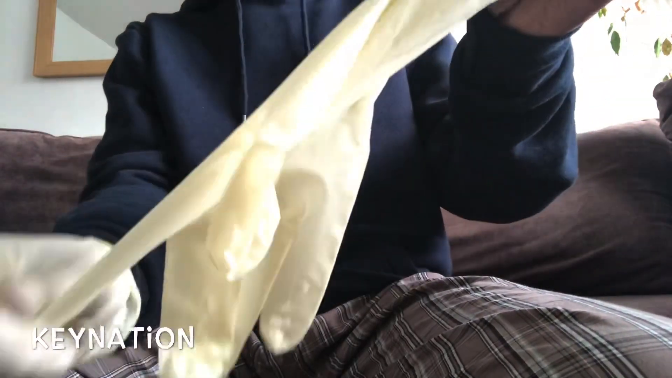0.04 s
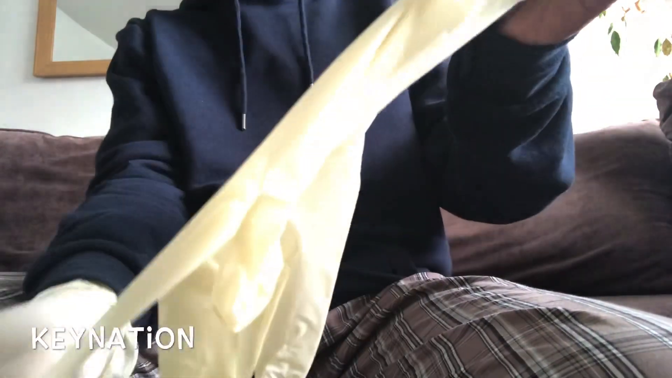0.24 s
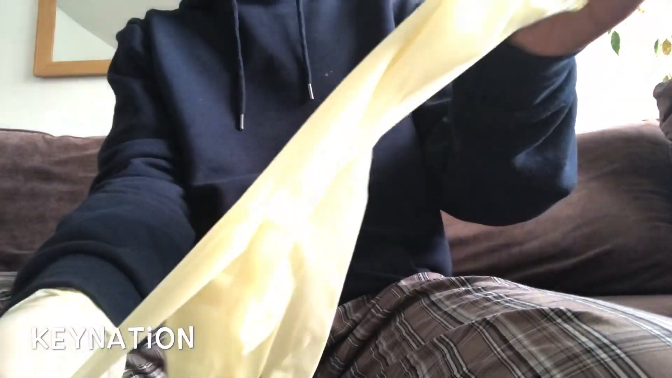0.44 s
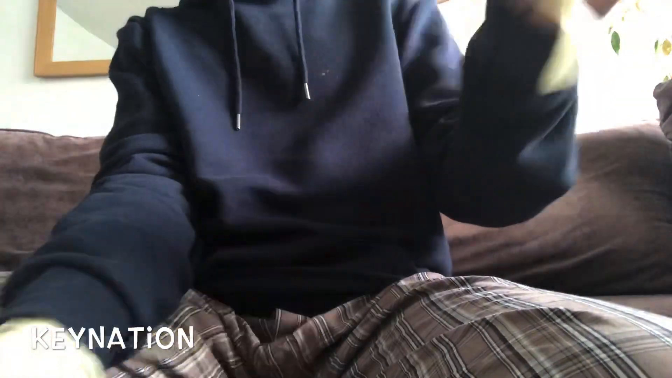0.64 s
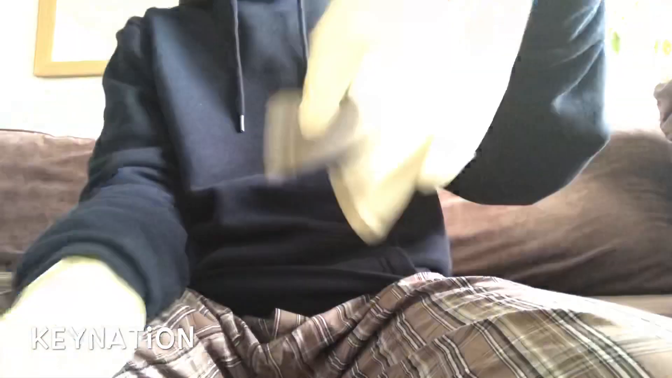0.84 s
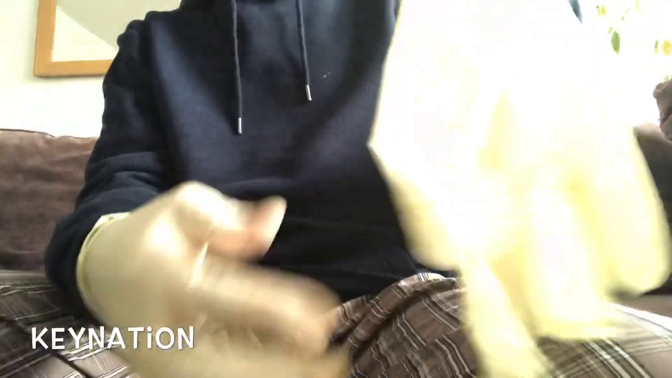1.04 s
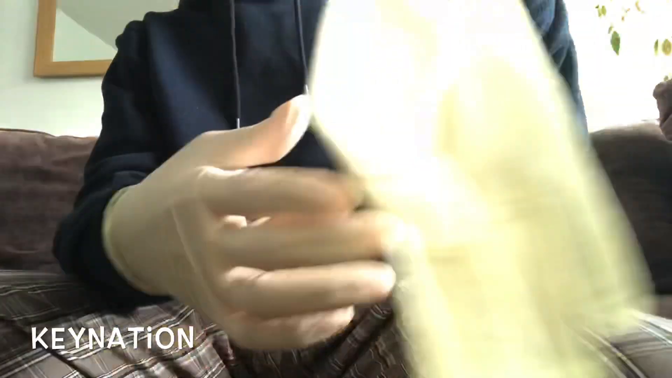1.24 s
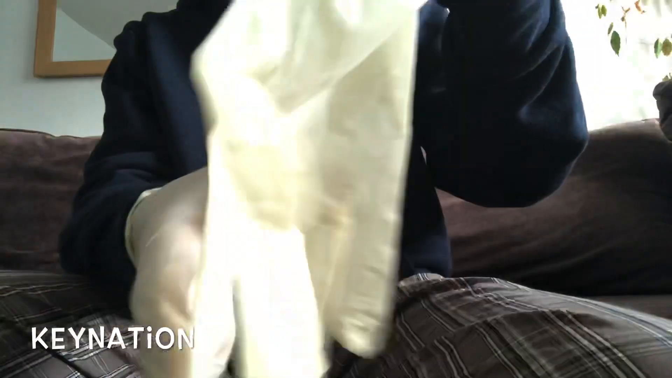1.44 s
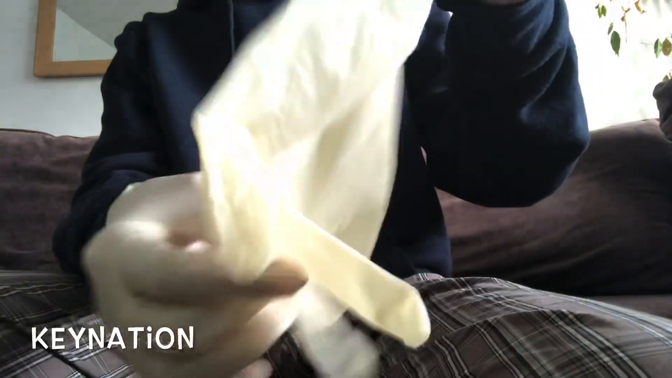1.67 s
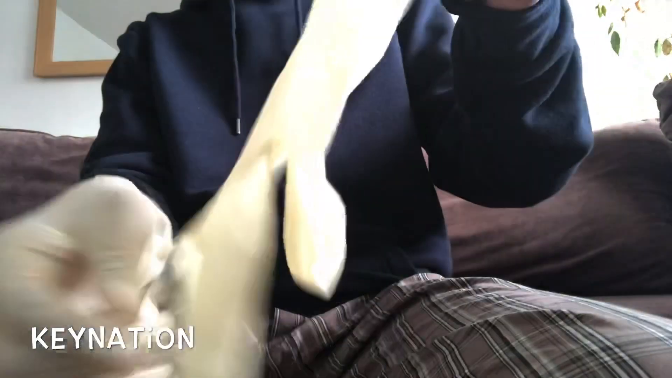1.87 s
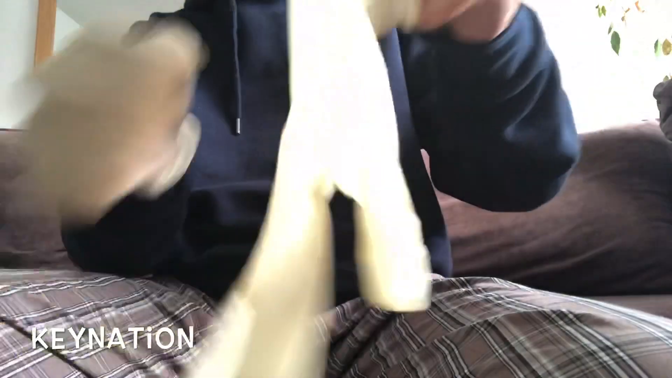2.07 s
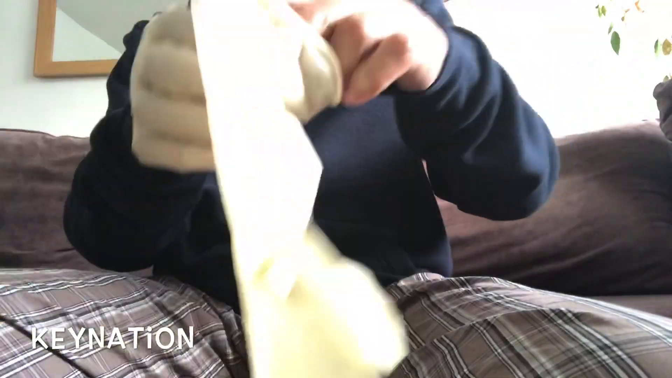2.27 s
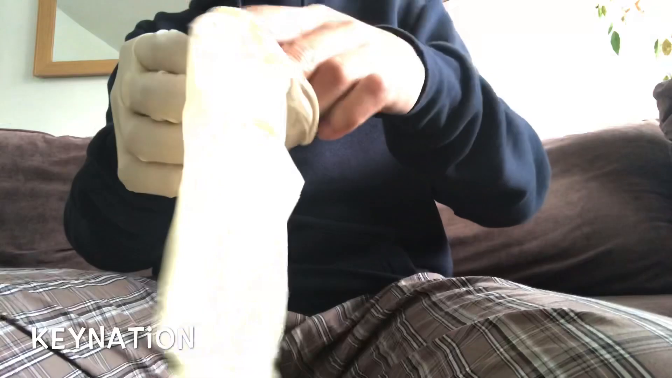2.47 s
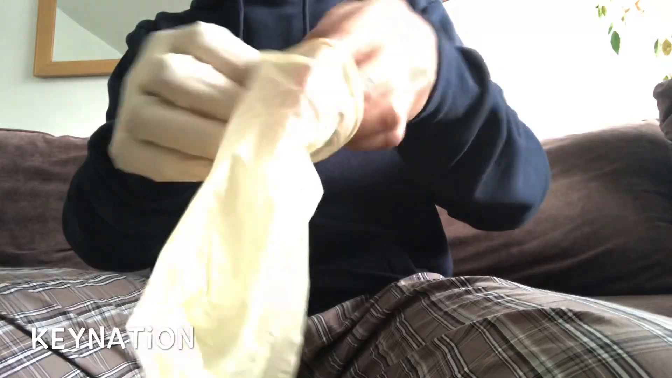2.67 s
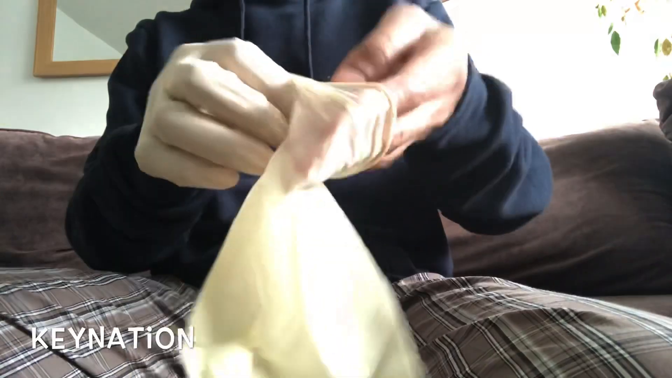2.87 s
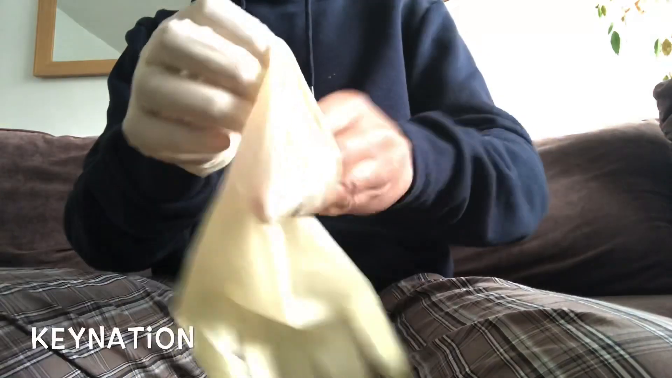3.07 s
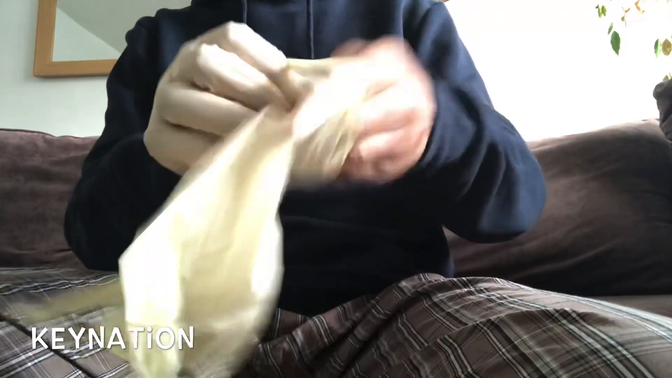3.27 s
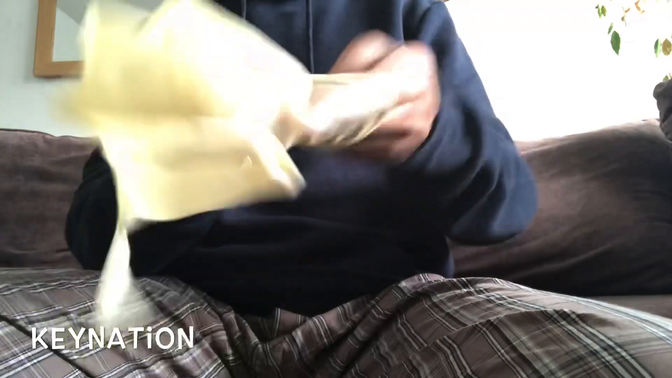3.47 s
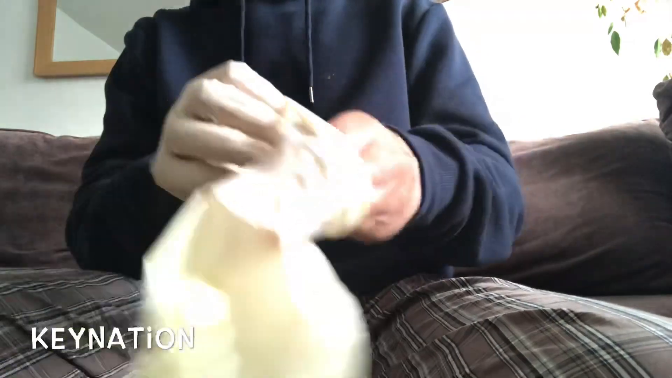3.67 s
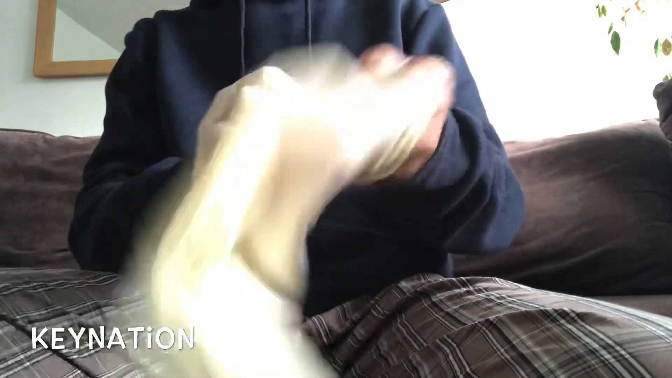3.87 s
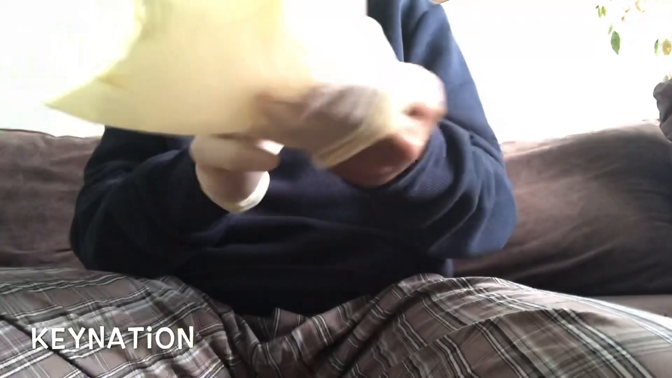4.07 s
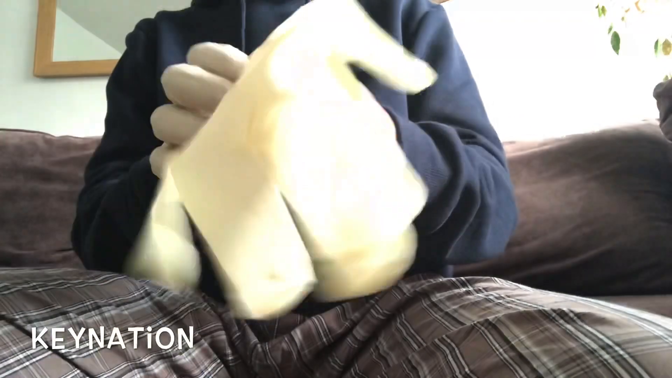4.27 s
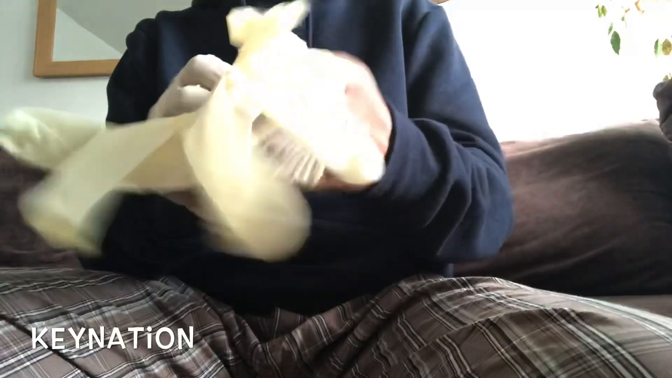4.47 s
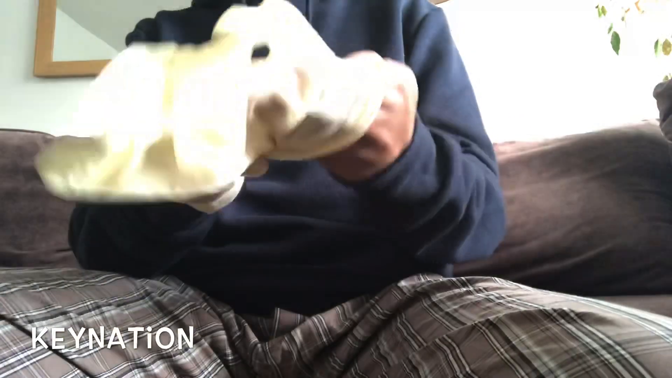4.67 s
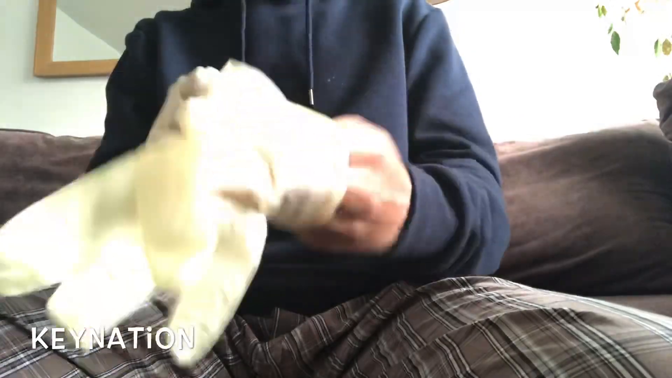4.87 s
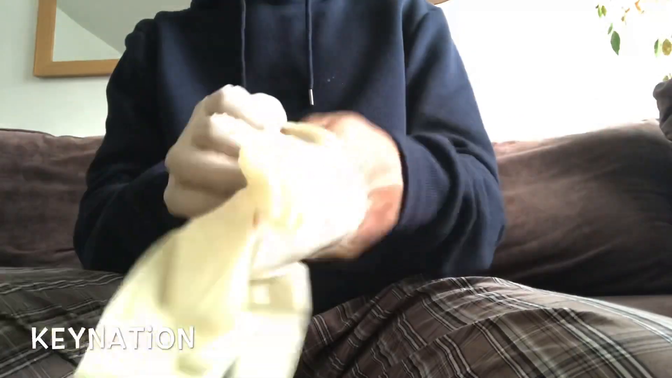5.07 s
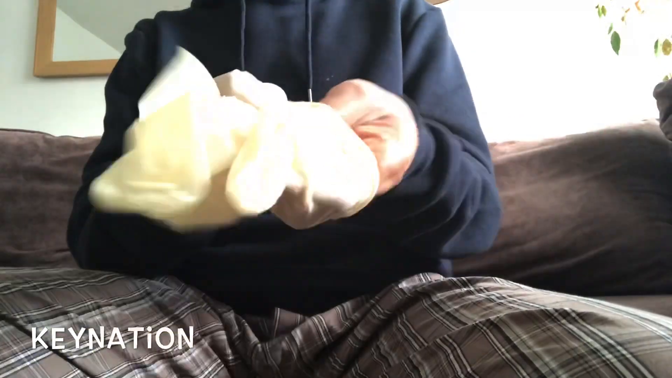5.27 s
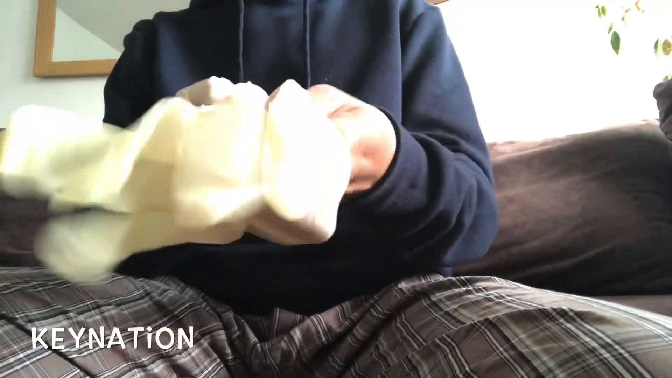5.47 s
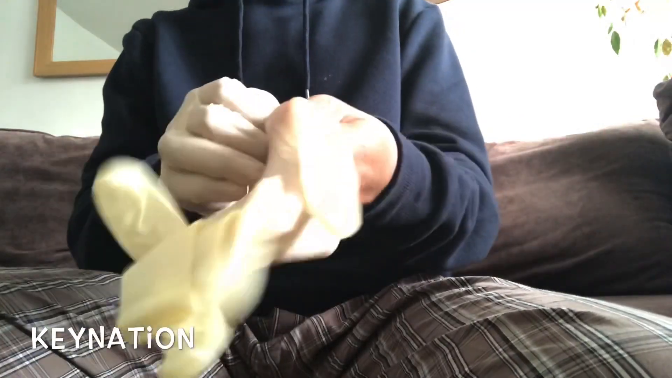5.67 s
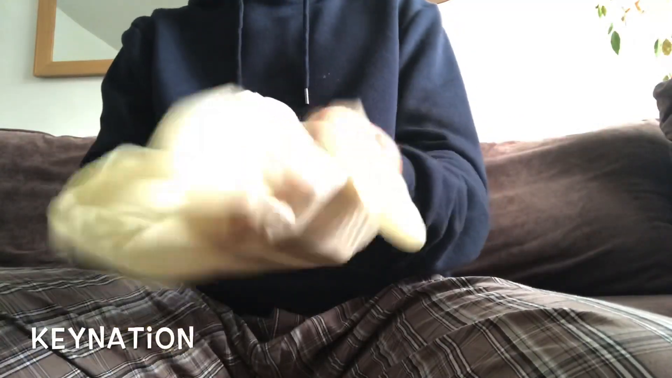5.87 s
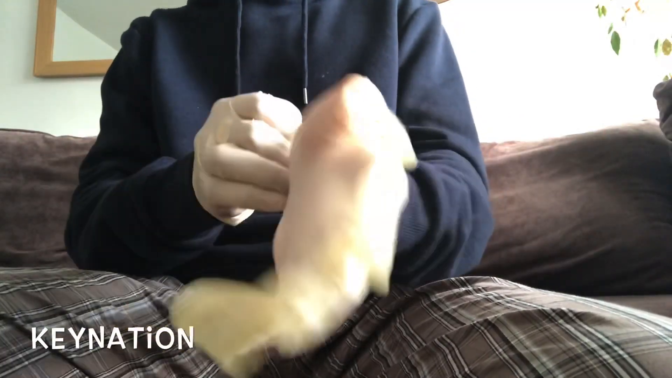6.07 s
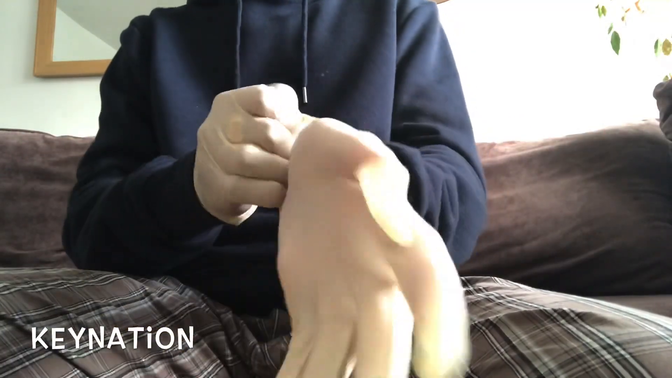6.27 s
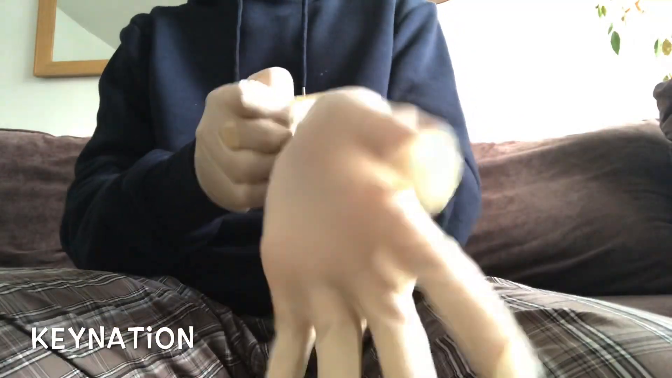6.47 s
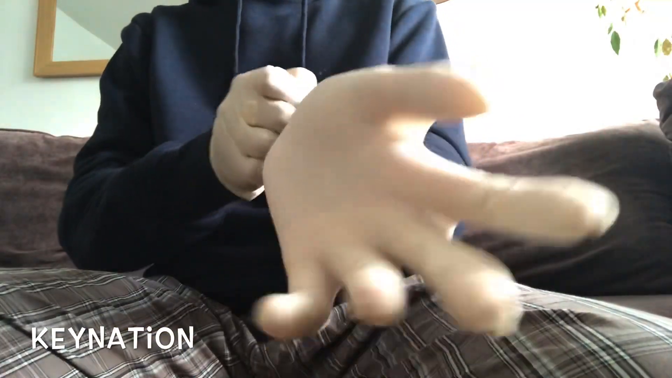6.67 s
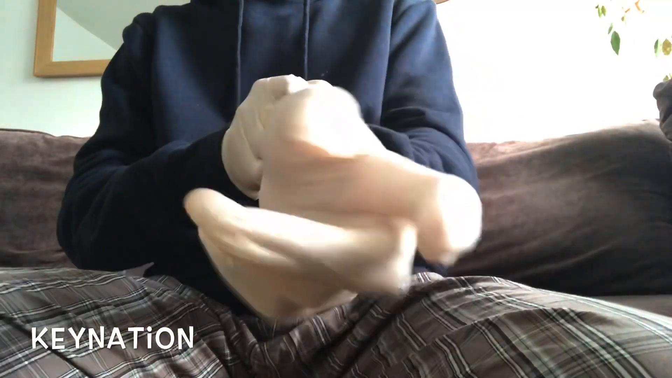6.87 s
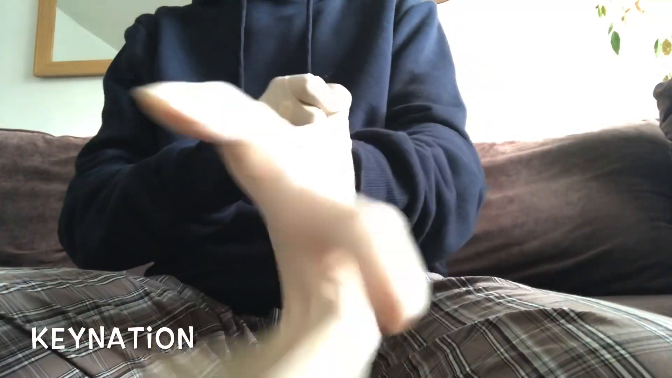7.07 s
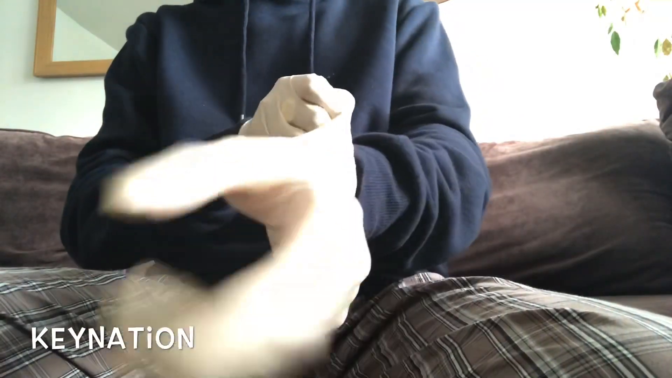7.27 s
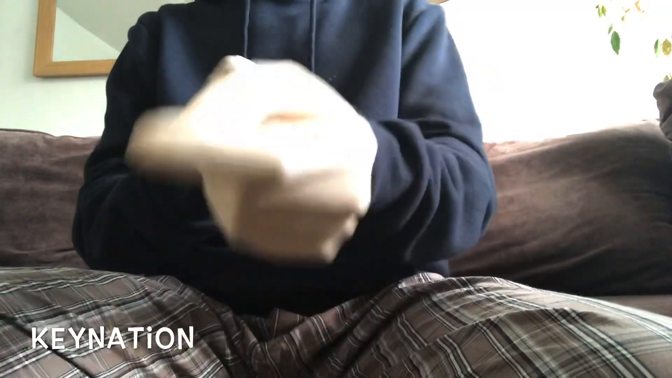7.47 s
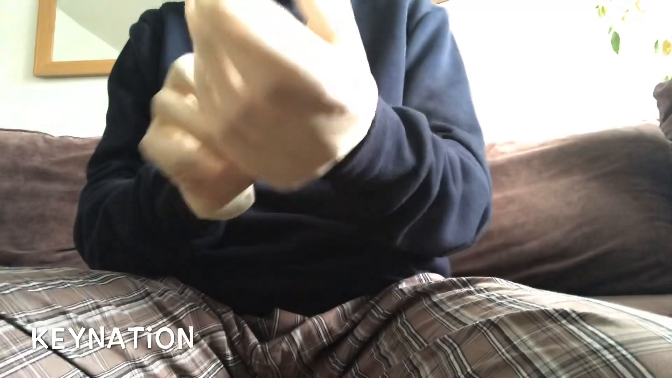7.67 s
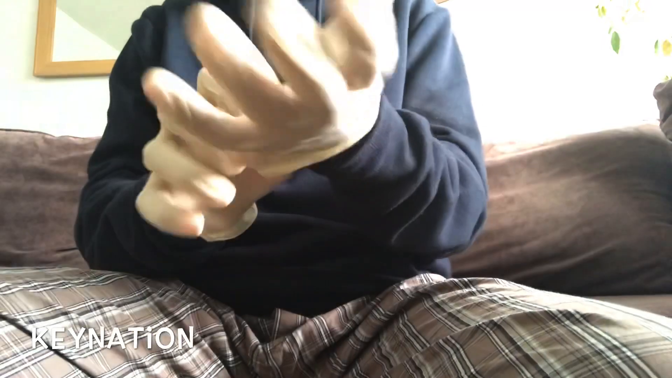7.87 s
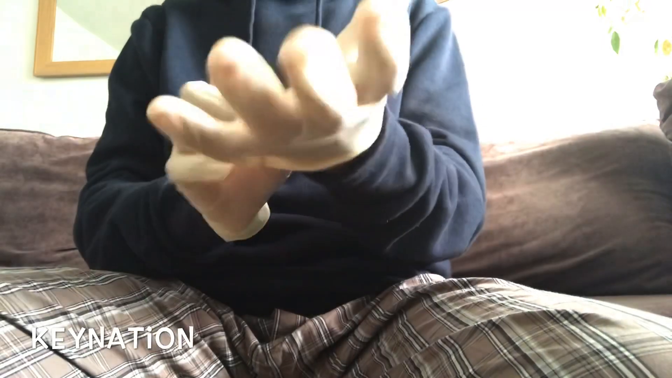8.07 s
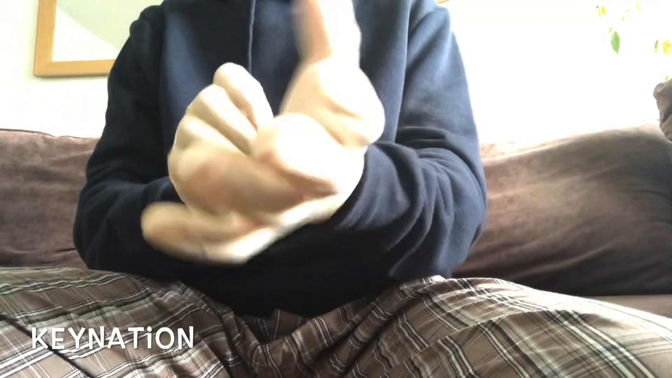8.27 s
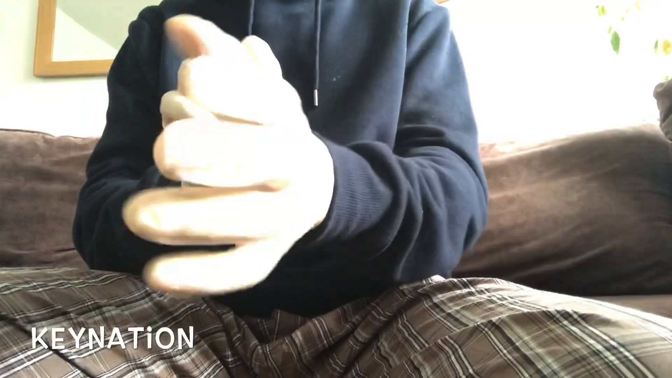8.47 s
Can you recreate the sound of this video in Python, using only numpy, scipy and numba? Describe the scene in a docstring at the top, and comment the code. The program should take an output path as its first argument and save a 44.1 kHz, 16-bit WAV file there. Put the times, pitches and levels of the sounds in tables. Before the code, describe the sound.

One hard rubber snap near the start, then a thin glove is worked onto a hand with squeaky rubbing, crinkles, small pops and later slaps.

```python
"""Someone stretches a latex glove, and at half a second it whips back with a run of slaps, rings and flaps.
Soft rubbing follows; from about three seconds the glove is worked onto a hand with stronger strokes, made of
countless tiny slips, while folds pop, air pockets give short falling notes and the taut cuff sings faintly.
Bursts of noise make harder slaps between four and eight and a half seconds, as pulled rubber is let go.
Sleeves rustle throughout, in the still air and soft echo of a quiet living room."""
import sys
import numpy as np
from scipy import signal
from scipy.fft import rfft, irfft
from scipy.io import wavfile
from numba import njit

SR = 44100
rng = np.random.default_rng(int(sys.argv[2]) if len(sys.argv) > 2 else 0)


def bounce(signal):
    """Save signal as a 16-bit WAV file at the path given by the first command-line argument."""
    frames = np.transpose(np.atleast_2d(signal))
    limited = np.clip(frames, -1, 1)
    pcm = np.round(limited * 32767).astype(np.int16)
    wavfile.write(sys.argv[1], SR, pcm)


N = 376613
TIME = np.arange(N) / SR   # seconds
MILLISECOND = SR / 1000   # in samples
LEAD = 96   # samples in which a contact swells before its kick
CUTOFF_HZ = 15950   # top of the sound

# The glove merely held; all levels are relative:
# sliding level/dB, loose folds/dB above sliding, dry sheen/dB above sliding
HOLDING = (-67, -2.0, -9.5)


def from_db(db):
    """Turn decibels into a factor of amplitude."""
    return 10 ** (np.asarray(db) / 20)


def rms_one(x):
    """Scale a sound to an average (root-mean-square) strength of 1."""
    return x / np.sqrt(np.mean(x ** 2) + 1e-20)


def in_time(rows):
    """Draw straight lines between the rows of a curve, giving each column sample by sample."""
    s, *columns = np.transpose(rows)
    return [np.interp(TIME, s, c) for c in columns]


def coloured(x, points):
    """Filter by a spectrum with no sound ahead of its cause (minimum phase); white noise keeps its power."""
    size = 4096
    hz, db = np.transpose(points)
    bins_hz = np.fft.rfftfreq(size, 1 / SR)
    gain = rms_one(from_db(np.interp(np.log(bins_hz + 1), np.log(hz), db)))
    # folding the cepstrum forward in time makes the filter minimum-phase
    cepstrum = irfft(np.log(gain))
    cepstrum[1:size // 2] *= 2
    cepstrum[size // 2 + 1:] = 0
    response = irfft(np.exp(rfft(cepstrum)))
    return signal.fftconvolve(x, response)[:len(x)]


def band(x, low_hz, high_hz):
    """Keep the pitches between two limits (Butterworth band-pass)."""
    high_hz = min(high_hz, SR / 2 - 1000)
    low_hz = min(low_hz, high_hz - 100)
    return signal.sosfilt(signal.butter(2, [low_hz, high_hz], "band", fs=SR, output="sos"), x)


def around(x, hz, octaves):
    """Band-pass given by its centre and width."""
    half = 2 ** (max(octaves, .2) / 2)
    return band(x, hz / half, hz * half)


def add(out, s, sound):
    """Mix in a short sound that starts at the given second."""
    at = round(s * SR)
    out[at:at + len(sound)] += sound[:N - at]


def at_level(sound, db):
    """Scale a short sound to the energy of one millisecond at this level."""
    return from_db(db) * sound * np.sqrt(MILLISECOND / np.sum(sound ** 2))


def contact(flutter_s, flutter_db, build_s):
    """One sharp kick amid a flutter of the thin sheet that swells and dies; longer flutter has more energy."""
    t = TIME[:2048] - TIME[LEAD]
    rise = t / max(build_s, 1 / SR)
    fall = -t / max(flutter_s, 1 / SR)
    swell = np.exp(np.minimum(rise, fall))
    kick = from_db(flutter_db) * rng.standard_normal(len(t)) * swell / np.sqrt(MILLISECOND)
    kick[LEAD] = 1
    return kick


def slips(per_s, spread_db):
    """Rubber sticks and lets go at random moments, by uneven amounts; average strength 1."""
    chance = np.clip(per_s / SR, 1 / SR, 1)
    sizes = from_db(spread_db * np.minimum(rng.exponential(1, N), 4)) * rng.choice([-1, 1], N)
    # dividing by the root of the chance keeps the power steady when the rate varies
    return rms_one(sizes * (rng.random(N) < chance) / np.sqrt(chance))


def snap(count=5):
    """The stretched glove hits the hand in a quick run, rings at its own pitches and flaps to rest."""
    # The blows as the glove whips back: t/s, relative level/dB
    blows = [(0.5376, -18), (0.5406, -11), (0.5433, -10), (0.5460, -14.5), (0.5516, -22.5)]
    # Tone colour of the blows and flaps: f/Hz, relative level per Hz/dB
    blow_colour = [(60, -9.5), (160, -12), (330, -5), (640, -12.5), (900, -10), (1450, -5), (1850, -6.5),
                   (2550, -5.5), (3300, -8.5), (4300, -8), (5600, -10), (8000, -14), (16000, -24)]
    # Ringing of the slack glove and the air in it: f/Hz, relative level/dB, time to fall by 60 dB/s
    glove_modes = [(66.3, -45, 0.49), (82.6, -20.5, 0.088), (107, -27, .07), (264, -40.5, 0.1),
                   (330, -40.5, 0.088), (476, -29.5, .07), (646, -23, 0.078), (1446, -24.5, 0.092),
                   (1970, -33.5, 0.053), (2410, -33.5, .06), (2570, -22.5, 0.052), (3040, -17, 0.036),
                   (3330, -15, 0.029), (5460, -20.5, 0.033)]
    first_flap_s, flap_gap_s, flap_flutter_s = 0.556, 0.009, 0.0034
    flap_db, flap_loss_db = -19.5, 1.7   # first flap, and average loss per flap
    out = np.zeros(N)
    hits = [(s, db, 0.0015) for s, db in blows]   # last number: flutter in s
    for k in range(count):
        flap_s = first_flap_s + flap_gap_s * (k + rng.normal(0, .05))
        hits.append((flap_s, flap_db - flap_loss_db * k + rng.normal(0, 1.2), flap_flutter_s))
    for s, db, flutter_s in hits:
        slap = coloured(contact(flutter_s, flutter_db=13.5, build_s=0.00038), blow_colour)
        add(out, s - TIME[LEAD], at_level(slap, db - 2.7))
    t = TIME[:SR // 2]
    ring_s = blows[1][0]   # the second blow starts the ringing
    for k, (hz, db, t60) in enumerate(glove_modes):
        decay = np.exp(-np.log(1000) * t / t60)
        sign = (-1) ** k
        add(out, ring_s, sign * from_db(db - 3.0) * decay * np.sin(2 * np.pi * hz * t))
    return out


def pop(db, hz, octaves, flutter_s):
    """Heavily damped latex flips over with a short pop, and its tacky surface parts with a crack and a tick."""
    kick = contact(flutter_s, flutter_db=0.5, build_s=0.00063)
    fold = at_level(around(kick, hz, octaves), db + 0.16)
    parting = contact(flutter_s, flutter_db=14.0, build_s=0.00004)
    crack = at_level(band(parting, 2740, 4670), db - 25.0)
    tick = at_level(band(parting, 12800, 16700), db - 19.0)
    return fold + crack + tick


def slaps():
    """Pulled rubber is let go and pops, the struck skin smacks; then a near wall or table echoes it."""
    # t/s, relative level/dB, centre f/Hz, width/octaves, flutter/s,
    # skin/dB above slap, echo after/s, echo/dB above slap
    slap_hits = [(4.1992, -29.5, 5140, 1.2, 0.0011, -7.5, 0.012, -27),
                 (6.8718, -20, 5600, 1.3, 0.0014, -6, 0.014, -13),
                 (7.588, -18.5, 1670, 0.66, 0.00045, -6.5, .011, -14),
                 (7.6317, -32, 1350, 2.6, 0.00042, -9, 0.0074, -16),
                 (8.024, -30.5, 1410, 2.3, 0.0016, -5.5, 0.0079, -11.5),
                 (8.1987, -32, 1070, 1.3, .001, -7, .01, -14),
                 (8.231, -20, 2480, 1.3, 0.00025, -17, .0085, -7.5),
                 (8.332, -27.5, 1370, 1.4, .0003, -8.5, 0.01, -14),
                 (8.5014, -34, 2720, 2.5, .0008, -5, 0.0095, -10)]
    # the echo is duller, wide and long
    echo_pitch, echo_octaves, echo_flutter_s = 0.57, 2.75, 0.0045
    skin_low_hz, skin_high_hz, skin_flutter_s = 700, 5500, 0.0019
    out = np.zeros(N)
    for s, db, hz, octaves, flutter_s, skin_db, echo_s, echo_db in slap_hits:
        skin = contact(skin_flutter_s, flutter_db=27.0, build_s=0.00028)
        smack = at_level(band(skin, skin_low_hz, skin_high_hz), db + skin_db)
        add(out, s - TIME[LEAD], pop(db, hz, octaves, flutter_s) + smack)
        echo = pop(db + echo_db, hz * echo_pitch, echo_octaves, echo_flutter_s)
        add(out, s + echo_s - TIME[LEAD], echo)
    return out


def pops(folds_db):
    """Big folds flip at set times; lesser ones flip at random, louder when the loose rubber is lively."""
    # Folds that flip over and rubber that lets go of skin: t/s, relative level/dB, centre f/Hz, width/octaves
    big = [(0.485, -52, 2200, 0.41), (0.685, -46.5, 890, 1.1), (0.7923, -41, 2800, 1.4),
           (0.799, -44, 2220, 1.4), (0.8019, -34.5, 1760, 0.84), (0.8106, -39.5, 520, 3.4),
           (0.8238, -44, 4500, 1.1), (0.8757, -47.5, 5030, 0.8), (1.2117, -47, 4350, 0.95),
           (1.2247, -46, 3000, 3.4), (1.2706, -49, 1070, 1.0), (1.608, -44, 1600, 0.93),
           (1.6822, -45, 1980, 1.1), (1.9125, -43, 1800, 3.5), (2.0919, -48, 900, 3.1),
           (2.4235, -48.5, 800, 3.4), (2.576, -47.5, 960, 1.7), (2.75, -38.5, 2000, 2.5),
           (3.1549, -39, 510, 2.7), (3.172, -39.5, 1350, 1.7), (3.2074, -42.5, 1600, 2.6),
           (3.2705, -32.5, 1300, 4.1), (3.3643, -41.5, 4300, 0.8), (3.551, -37.5, 650, 3.2),
           (3.5556, -36, 1850, 1), (3.6947, -28.5, 2030, 1), (3.739, -43, 600, 3.8),
           (3.7497, -36, 2500, 3.5), (3.881, -40.5, 900, 1.9), (3.8919, -33, 1230, 1.3),
           (3.9387, -39.5, 2430, 1.15), (3.979, -40, 1320, 1.1), (4.1866, -40, 4900, 1.8),
           (4.1982, -34, 1100, 4), (4.3173, -41, 1730, 1.1), (4.3708, -36, 2160, 0.69),
           (4.3977, -39, 2200, 1.2), (4.4565, -39, 3200, 2.8), (4.5132, -37.5, 1450, 3.2),
           (4.5522, -38.5, 1120, 1.3), (4.704, -46, 760, 4), (5.083, -38.5, 2000, 1.2),
           (5.1713, -38.5, 1700, 1.9), (5.2333, -44, 2000, 0.8), (5.2943, -36, 1460, 0.5),
           (5.4852, -38, 1490, 0.47), (5.504, -44, 1500, 1.0), (5.531, -43, 1050, 1.7),
           (5.615, -39.5, 4450, 0.35), (5.8724, -35.5, 890, 3.3), (5.9302, -33.5, 2320, 6.2),
           (6.459, -34, 2460, 0.45), (6.5403, -29, 2220, 1.43), (7.2248, -42, 2150, 3.1),
           (7.2457, -43, 3600, 2.3), (7.2562, -45, 5330, 0.81), (7.4168, -47, 2190, 0.87),
           (7.4237, -37, 3020, 1), (7.439, -45.5, 1330, 3.0), (7.5199, -41.5, 3150, 2.1),
           (7.9192, -36, 4500, 5.4), (7.9367, -35, 11000, 0.81), (7.9703, -43, 9200, 0.85),
           (8.0055, -37, 7900, 1.7), (8.014, -37, 900, 2.9), (8.0197, -34.5, 8500, 1.9),
           (8.0321, -32.5, 10000, 1.2), (8.0424, -47, 10000, 1.1)]
    small_per_s, small_octaves = 22.0, 1.5
    small_low_hz, small_high_hz = 900, 2300
    # level at the quietest moment, share of the loose rubber's rise in dB, random spread either way
    small_db, follow, spread_db = -58, 0.5, 2.5
    flutter_s_per_octave = 0.00062   # a wider pop is a more ragged one
    out = np.zeros(N)
    draws = rng.random((400, 3))
    moments = np.cumsum(-np.log(1 - draws[:, 0])) / small_per_s
    small = []
    for s, (_, size, pitch) in zip(moments, draws):
        if TIME[LEAD] < s < TIME[-1]:
            rise_db = follow * (folds_db[int(s * SR)] - folds_db.min())
            db = small_db + rise_db + spread_db * (2 * size - 1)
            hz = small_low_hz * (small_high_hz / small_low_hz) ** pitch
            small.append((s, db, hz, small_octaves))
    for s, db, hz, octaves in list(big) + small:
        add(out, s - TIME[LEAD], pop(db, hz, octaves, flutter_s_per_octave * octaves))
    return out


def hands():
    """Strokes swell, hold and die away over the held glove: levels in dB of sliding, folds and sheen."""
    # Each pull or rub: start t/s, length/s, relative sliding level/dB,
    # loose folds/dB above sliding, dry sheen/dB above sliding
    strokes = [(-0.03, 0.055, -55.5, -13, -18), (0.494, .21, -58, -4.5, -13),
               (0.746, 0.083, -59.5, -1.5, -8), (0.86, 0.13, -64, -5, -11), (1.18, 0.091, -64, 0, -3),
               (1.29, 0.14, -61.5, -9, -1.5), (1.41, .22, -59.5, -4.5, -10),
               (1.645, 0.083, -55.5, -5, -5.5), (1.775, 0.064, -59, -3, -7), (1.985, .22, -64.5, 0, -8),
               (2.302, 0.059, -60.5, -5, -1), (2.42, 0.089, -61, -6, 0), (2.504, 0.091, -59, 4.5, -3.5),
               (2.63, 0.076, -54.5, -0.5, 0.5), (2.797, 0.146, -61.5, -7, -2.5),
               (2.917, .12, -51, -8, -2.5), (3.128, 0.102, -51.5, -1.5, -1.5), (3.21, 0.096, -50, -4, -2.5),
               (3.34, 0.13, -57.5, 0, -8.5), (3.48, 0.069, -54.5, -1, 0.5), (3.531, 0.035, -49, 1, -2.5),
               (3.606, 0.12, -53.5, -4.5, -8), (3.717, .11, -52.5, -1, -2.5), (3.84, .13, -56, -4, -18),
               (3.964, 0.2, -52, 0.5, -5.5), (4.299, .11, -51.5, -0.5, -5), (4.425, 0.11, -48, -9, -8.5),
               (4.625, 0.11, -57, -2, -11), (4.721, 0.33, -52, -11.5, -7), (5.026, 0.12, -50.5, 0, -7.5),
               (5.162, 0.14, -56, 0.5, -7), (5.277, 0.081, -49, -2, -6), (5.454, 0.1, -50, -1, -10),
               (5.56, 0.18, -54.5, -1, -14), (5.694, 0.18, -50, -2.5, -6), (5.836, .11, -45, -4, -8),
               (5.957, 0.317, -45, -10.5, -8.5), (6.29, 0.21, -48, -4, -8), (6.475, 0.1, -47, -6.5, -6),
               (6.577, 0.089, -52, -9, -20), (6.709, 0.22, -56, -10, -8.5),
               (6.841, 0.19, -51.5, -11.5, -14), (7.06, .1, -62.5, -8, -6), (7.163, 0.071, -52.5, -8, -10),
               (7.275, 0.069, -54, -11, -4), (7.386, 0.078, -57, -2, -4), (7.467, 0.18, -56.5, -4, -11),
               (7.72, 0.25, -60, -4.5, -8.5), (7.986, 0.14, -58.5, -2.5, -19), (8.211, 0.15, -62.5, 4, -23),
               (8.427, .12, -69, -4.5, 2)]
    # the swell is half done once the slack is taken up; attack sets how gradual it is
    slack_s, attack_s, release_s = 0.016, 0.011, 0.056

    def three_levels(slide_db, folds_db, sheen_db):
        """Amplitudes of sliding, folds and sheen, one per row."""
        return from_db(slide_db + np.array([[0], [folds_db], [sheen_db]]))

    power = np.ones(N) * three_levels(*HOLDING) ** 2
    for s, length_s, slide_db, folds_db, sheen_db in strokes:
        near = slice(max(int(s * SR) - SR // 10, 0), int((s + 1) * SR))
        t = TIME[near] - s
        swell = (1 + np.tanh((t - slack_s) / (2 * attack_s))) / 2
        envelope = swell * np.exp(-np.maximum(t - length_s, 0) / release_s)
        power[:, near] += (envelope * three_levels(slide_db, folds_db, sheen_db)) ** 2
    return 10 * np.log10(power)


def grip(per_s):
    """The rubber catches and eases on the skin at random, no faster than about this rate; spread 1."""
    smooth = signal.butter(2, per_s, fs=SR, output="sos")
    return rms_one(signal.sosfilt(smooth, rng.standard_normal(N)))


def crinkles(per_s, count=7):
    """Small wrinkles flip at random, each size in a pitch band of its own."""
    centres = np.geomspace(1100, 3200, count)   # Hz
    return rms_one(sum(band(slips(per_s / count, spread_db=5.0), hz / 1.26, hz * 1.18) for hz in centres))


def rubbing(slide_db, folds_db, sheen_db, catch_db):
    """Faster sliding gives more slips; the finest make a sheen, and loose folds crinkle in sparse clumps."""
    # Tone colours of sliding, loose folds and dry sheen: f/Hz, relative level per Hz/dB
    slide_colour = [(400, -18.5), (800, -13), (1250, -8), (1700, -12), (2500, -0.5), (3600, 0.5),
                    (4400, 0.5), (5000, -1.5), (6200, -0.5), (8000, -10), (11000, -14.5)]
    folds_colour = [(400, -11), (780, -10), (1100, -1), (1550, 3.5), (2200, 2), (2900, -14.5),
                    (5000, -21.5)]
    sheen_colour = [(5000, -6.5), (7500, 1.5), (9000, 1), (12500, 1.5), (15800, -7.5)]
    speed = from_db((slide_db - slide_db.max()) / 2)   # 1 at the strongest stroke
    level_db = slide_db + catch_db * grip(34)
    slide = from_db(level_db - 0.17) * coloured(slips(20000 * speed, spread_db=2.0), slide_colour)
    fine_slips = slips(35000 * speed, spread_db=2.5)
    sheen = from_db(level_db + sheen_db + 2.5) * coloured(fine_slips, sheen_colour)
    wrinkles = coloured(slips(3000 * speed, spread_db=3.0), folds_colour)
    wrinkles = wrinkles + from_db(-5.5) * crinkles(per_s=120)
    wrinkle_level = from_db(level_db + folds_db - 3.0 + catch_db * grip(60))
    return slide + sheen + wrinkle_level * wrinkles


@njit
def moving_resonance(x, angle, r):
    """A resonance (two poles) whose centre moves from sample to sample."""
    y = np.zeros(len(x))
    for i in range(2, len(x)):
        y[i] = x[i] - x[i - 2] + 2 * r * np.cos(angle[i]) * y[i - 1] - r * r * y[i - 2]
    return y


def cuff(slide_db, width_hz):
    """Once the hand is inside, slips ring the tight cuff, whose pitch follows its tension."""
    # Resonance, low while bunched and high once drawn tight: t/s, f/Hz, level before trim/dB above sliding
    cuff_curve = [(2.9, 2160, -14), (3.3, 2150, -7), (4.55, 2170, -7), (4.9, 1700, -9.5), (5.55, 1490, -9),
                  (5.75, 3500, -6), (5.92, 3530, -14), (6.22, 3380, -2.5), (6.4, 2750, -1), (6.6, 3400, -6),
                  (6.83, 3500, -6), (6.9, 5200, -3), (7.02, 4400, -8), (7.15, 3600, -11)]
    hz, db = in_time(cuff_curve)
    angle = 2 * np.pi * hz / SR
    r = np.exp(-np.pi * width_hz / SR)   # the width of each of two resonances in a row
    once = moving_resonance(slips(5000, spread_db=4.5), angle, r)
    sung = moving_resonance(once, angle, r)
    return from_db(slide_db + db - 2.5) * rms_one(sung) * (TIME > cuff_curve[0][0])


def pockets(sag, sag_s):
    """Air squeezed from between glove and hand gives a note that falls as the pocket's wall slackens."""
    # t/s, relative level/dB, starting f/Hz, time to fall by 60 dB/s
    pocket_notes = [(0.8055, -48, 1400, 0.074), (3.275, -44, 330, 0.037), (3.455, -43, 523, 0.021),
                    (4.801, -42, 523, 0.017), (5.89, -42, 193, 0.055), (5.932, -35, 676, 0.015),
                    (6.112, -43.5, 710, 0.027), (6.872, -48, 132, 0.12), (6.874, -40.5, 290, 0.04),
                    (7.59, -33.5, 447, 0.016), (8.24, -38.5, 633, 0.065), (8.332, -37.5, 347, 0.028)]
    out, t = np.zeros(N), TIME[:SR // 6]
    for s, db, hz, t60 in pocket_notes:
        pitch = hz * (1 - sag * (1 - np.exp(-t / sag_s)))
        decay = np.exp(-np.log(1000) * t / t60)
        add(out, s, from_db(db) * decay * np.sin(2 * np.pi * np.cumsum(pitch) / SR))
    return out


def sleeves(slide_db):
    """Cloth rustles with every stroke and swells briefly when a hard tug jerks the arm."""
    # Tone colour of the cloth: f/Hz, relative level per Hz/dB
    cloth_colour = [(25, -30), (45, -11), (75, 4.5), (130, -0.5), (230, 0), (460, -3.5), (650, -7.5),
                    (1000, -9.5), (2500, -47.5)]
    # Hard tugs: t/s, relative level/dB
    tugs = [(1.36, -65), (1.92, -65), (2.98, -58.5), (3.165, -52.5), (3.21, -55), (3.275, -51),
            (3.458, -51.5), (3.56, -51.5), (3.745, -56.5), (4.05, -58.5), (4.2, -57.5), (4.4, -57),
            (5.1, -58), (5.369, -50.5), (5.52, -51.5), (5.885, -49.5)]
    held_db, follow = -68.5, 0.15   # level while holding, share of the hands' rise in dB
    tug_s = 0.012   # time from a tug's peak to half its height
    level = from_db(held_db + follow * (slide_db - HOLDING[0]))
    for s, db in tugs:
        level = np.hypot(level, from_db(db) / (1 + ((TIME - s) / tug_s) ** 2))
    return level * coloured(slips(2500, spread_db=3.5), cloth_colour)


def still_air():
    """The quiet background is steady random noise, strongest in the bass."""
    # Tone colour of the background: f/Hz, relative level per Hz/dB
    air_colour = [(15, -66.5), (28, -35.5), (38, 11.5), (55, 4.5), (78, 4), (110, -6), (170, -21),
                  (400, -20.5), (1500, -14), (4000, -28), (8000, -34), (16000, -40.5)]
    return from_db(-68.0) * coloured(rng.standard_normal(N), air_colour)


def room(x, echo_s, echo_db, tail_db, build_s):
    """A near wall gives one echo amid a diffuse tail of noise, which dies at its own rate in each band."""
    # Bands of the tail: centre f/Hz, relative level/dB, time to fall by 60 dB/s
    tail_bands = [(122, -12, 0.28), (340, -3, 0.31), (1060, -3, 0.22), (2800, -6.5, 0.27), (6540, -3, 0.23),
                  (13000, -2.5, 0.21)]
    t = TIME[:SR * 2 // 3]
    centres = np.array(tail_bands)[:, 0]
    edges = np.r_[centres[0] / 2, np.sqrt(centres[1:] * centres[:-1]), CUTOFF_HZ]
    response = np.zeros(len(t))
    for (hz, db, t60), low, high in zip(tail_bands, edges, edges[1:]):
        noise = band(rng.standard_normal(len(t)), low, high)
        response += from_db(db) * noise * np.exp(-np.log(1000) * t / t60)
    response *= 1 - np.exp(-t / build_s)
    response *= from_db(tail_db) / np.sqrt(np.sum(response ** 2))
    response[round(echo_s * SR)] += from_db(echo_db)
    return x + signal.fftconvolve(x, response)[:N]


def scene():
    """The hands drive glove and sleeves, which sound in the room; the still air is added afterwards."""
    slide_db, folds_db, sheen_db = hands()
    rubbed = rubbing(slide_db - 3.5, folds_db - slide_db, sheen_db - slide_db, catch_db=1.01)
    sung = cuff(slide_db, width_hz=900)
    glove = rubbed + sung + snap() + slaps() + pockets(sag=0.25, sag_s=0.0061) + pops(folds_db)
    cloth = sleeves(slide_db)
    in_room = room(glove + cloth, echo_s=.0103, echo_db=-32.0, tail_db=-14, build_s=0.0021)
    return (in_room + still_air())[None]


def record(dry, notch_hz=10400, notch_width_hz=1900, notch_share=0.35, bass_cut_hz=42):
    """The close microphone sheds the deep bass and has a shallow dip in the treble; the top is cut."""
    thinned = signal.sosfilt(signal.butter(3, bass_cut_hz, "high", fs=SR, output="sos"), dry)
    b, a = signal.iirnotch(notch_hz, notch_hz / notch_width_hz, fs=SR)
    notched = signal.lfilter(b, a, thinned)
    # only a share of the full notch, so the dip stays shallow
    dipped = thinned + np.clip(notch_share, 0, 1) * (notched - thinned)
    return signal.sosfilt(signal.ellip(10, .2, 70, CUTOFF_HZ, fs=SR, output="sos"), dipped)


dry = scene()
out = record(dry)
bounce(out)
```